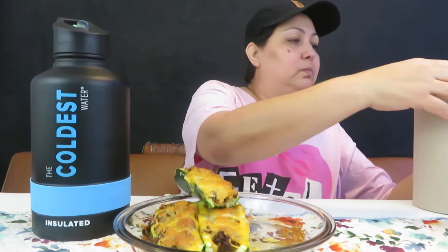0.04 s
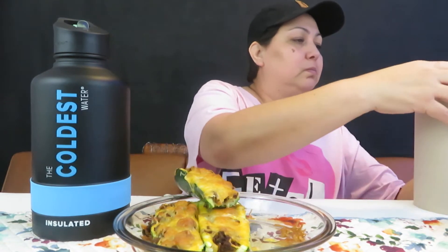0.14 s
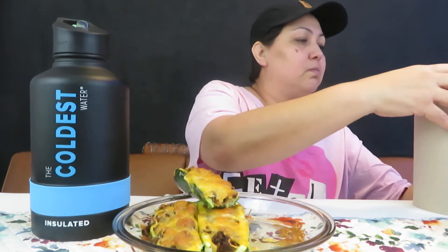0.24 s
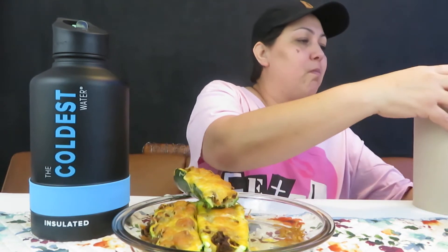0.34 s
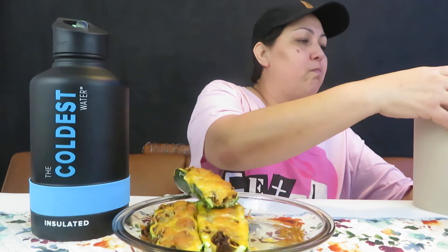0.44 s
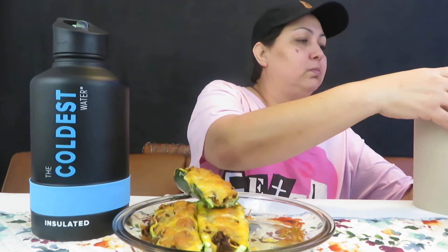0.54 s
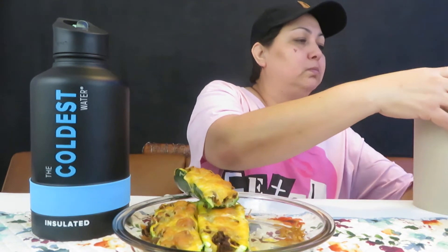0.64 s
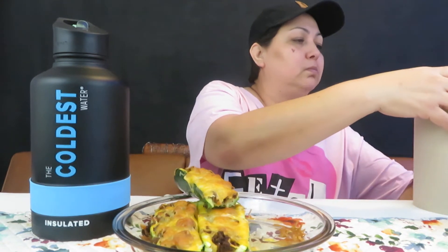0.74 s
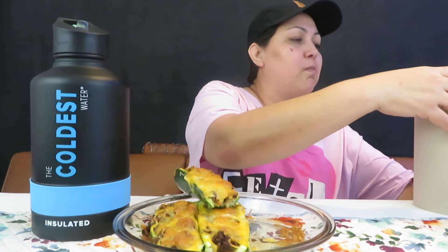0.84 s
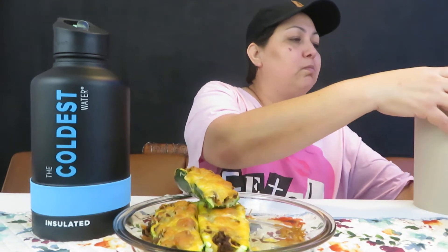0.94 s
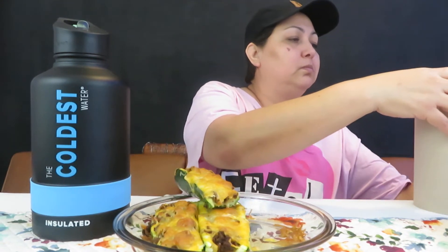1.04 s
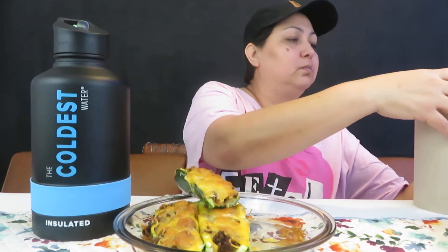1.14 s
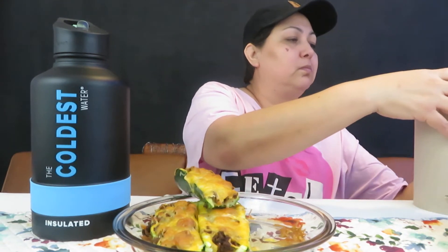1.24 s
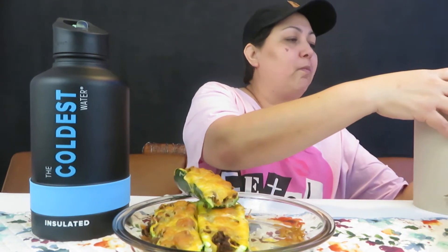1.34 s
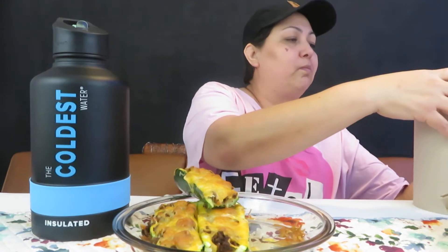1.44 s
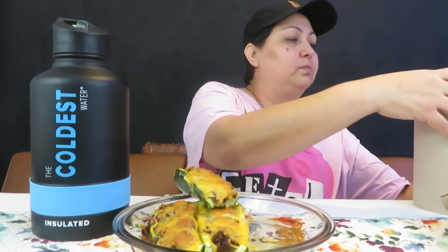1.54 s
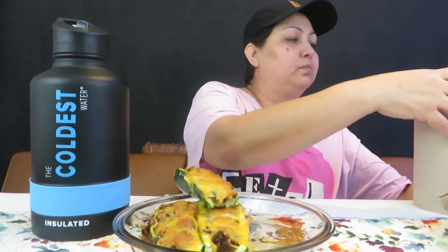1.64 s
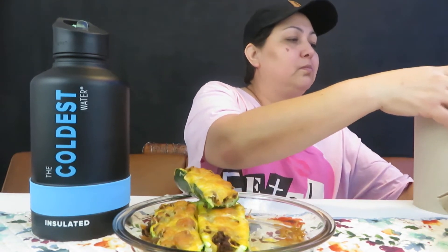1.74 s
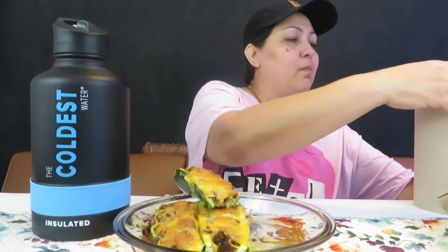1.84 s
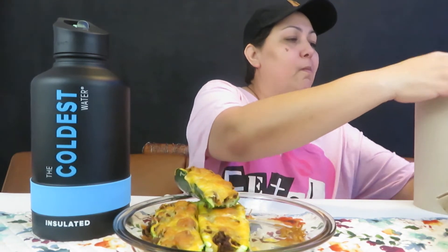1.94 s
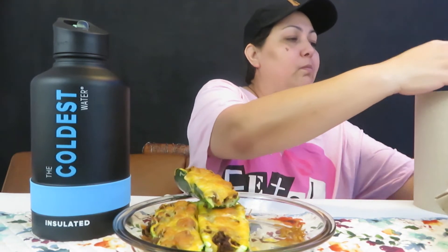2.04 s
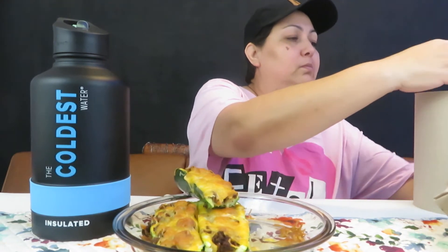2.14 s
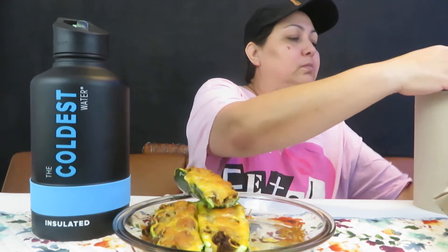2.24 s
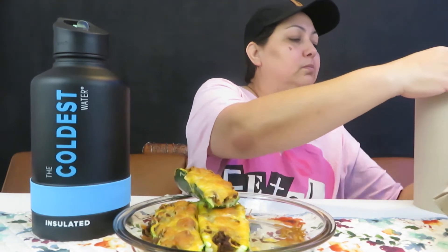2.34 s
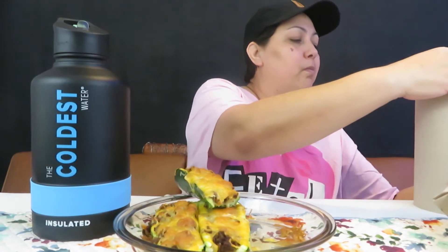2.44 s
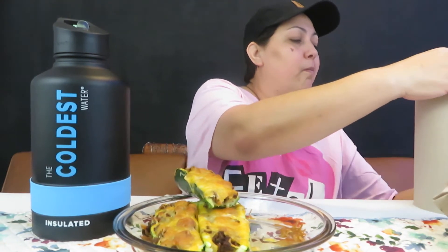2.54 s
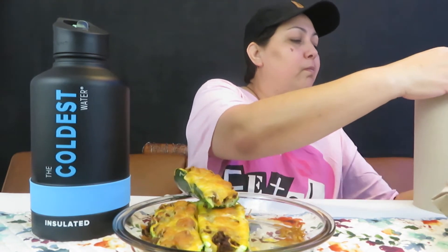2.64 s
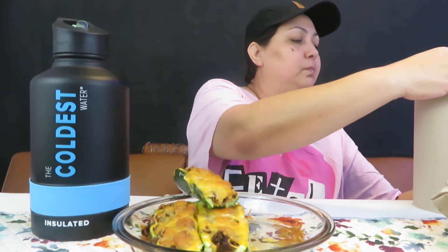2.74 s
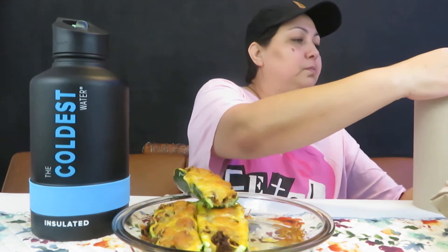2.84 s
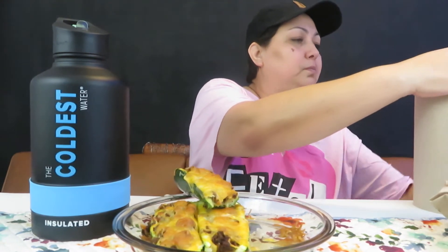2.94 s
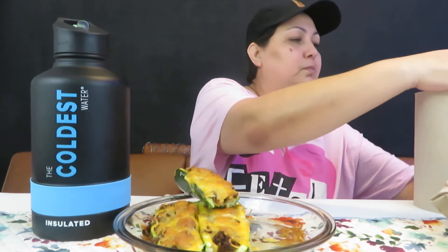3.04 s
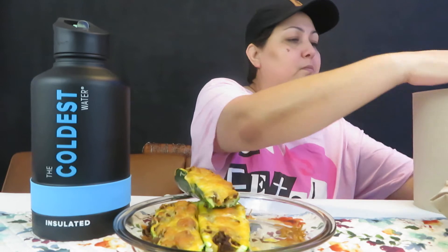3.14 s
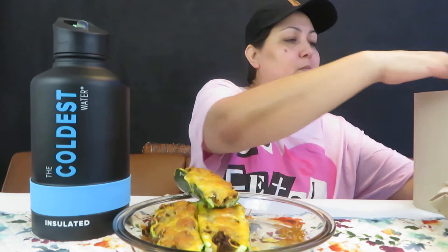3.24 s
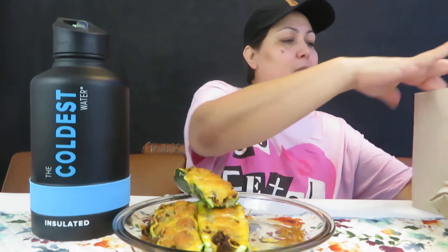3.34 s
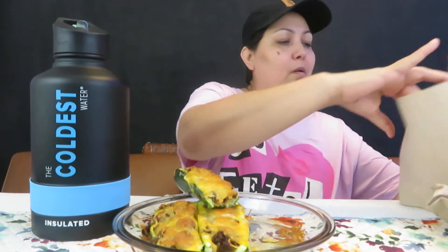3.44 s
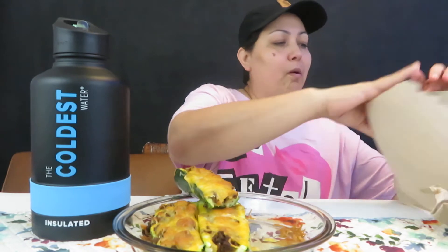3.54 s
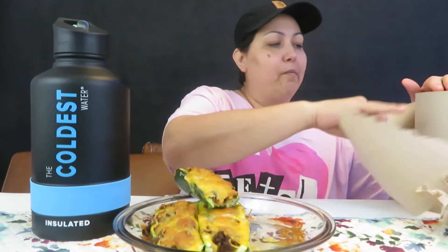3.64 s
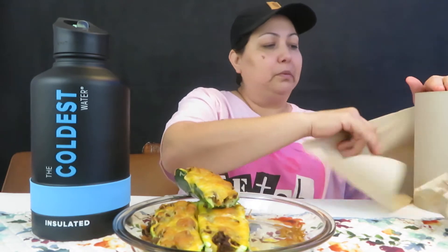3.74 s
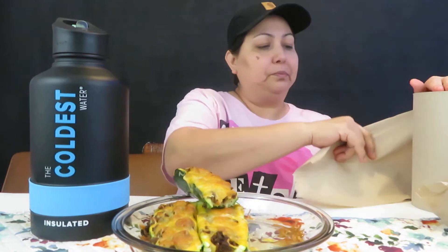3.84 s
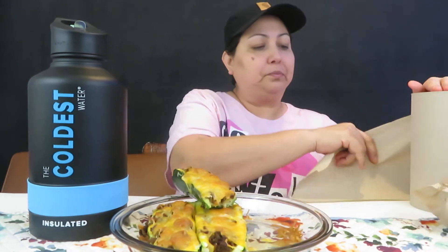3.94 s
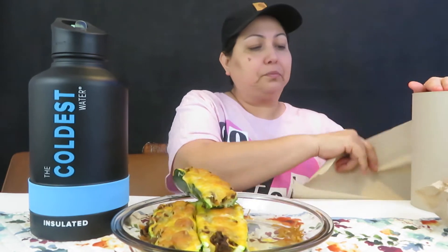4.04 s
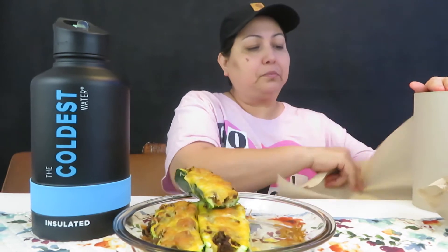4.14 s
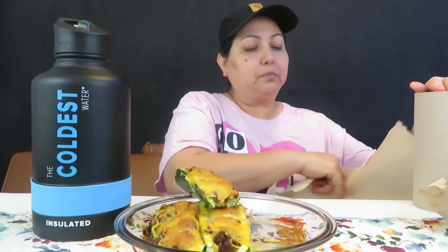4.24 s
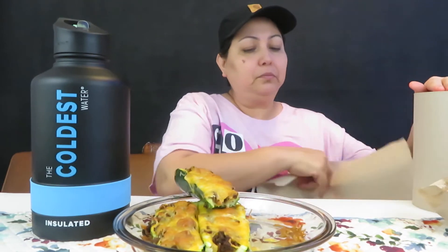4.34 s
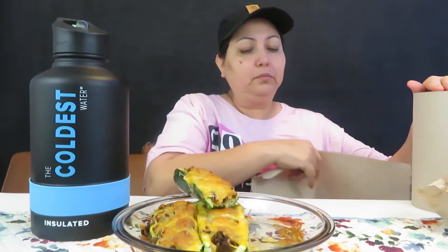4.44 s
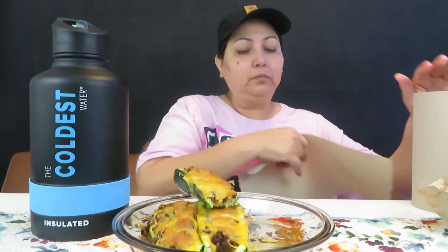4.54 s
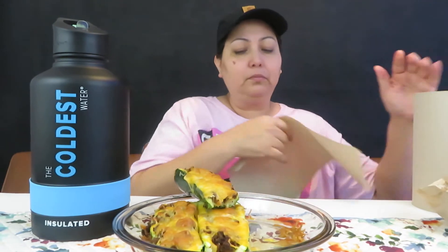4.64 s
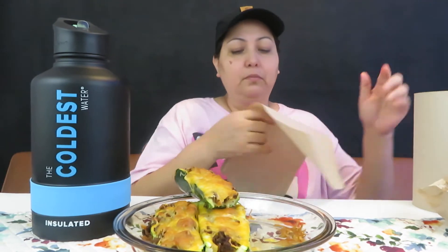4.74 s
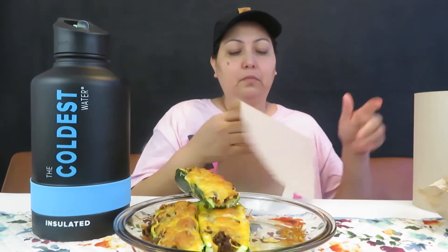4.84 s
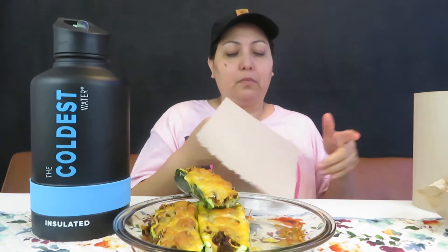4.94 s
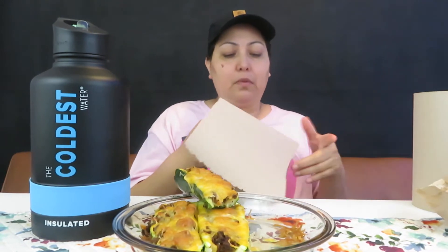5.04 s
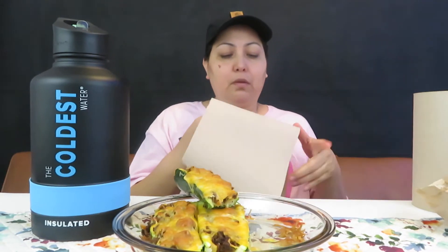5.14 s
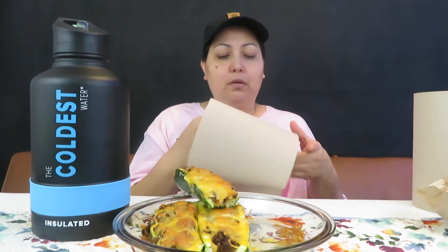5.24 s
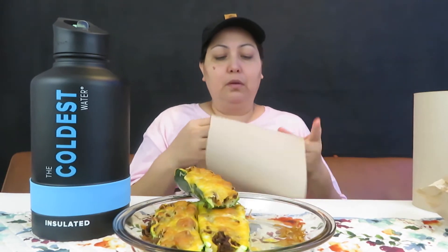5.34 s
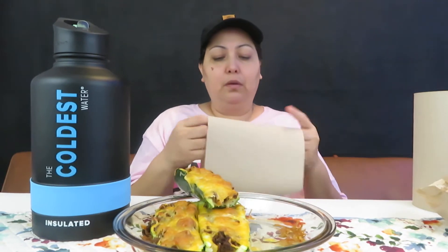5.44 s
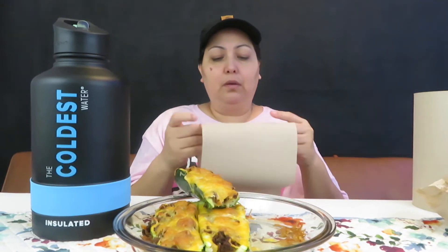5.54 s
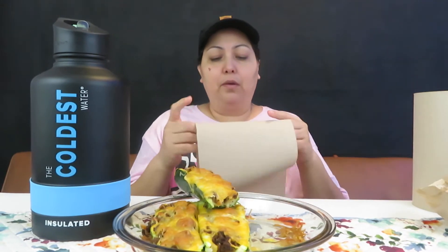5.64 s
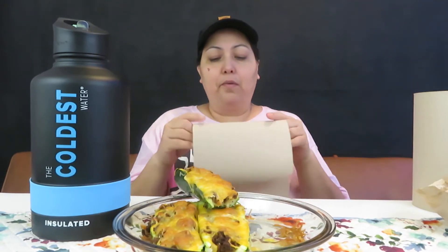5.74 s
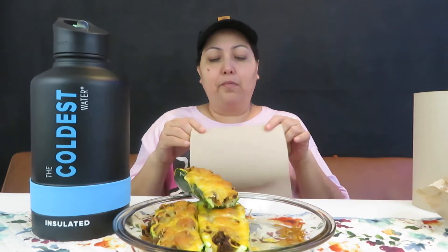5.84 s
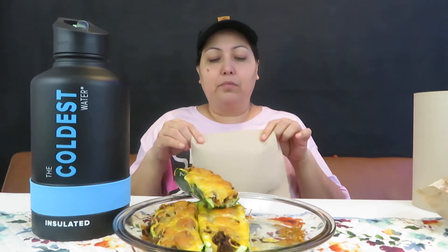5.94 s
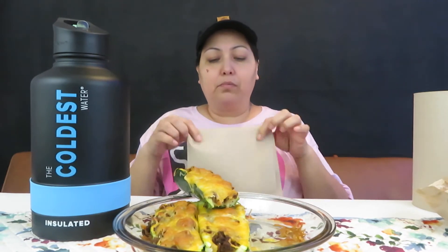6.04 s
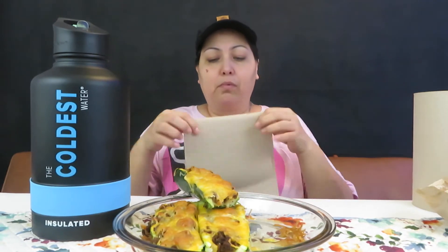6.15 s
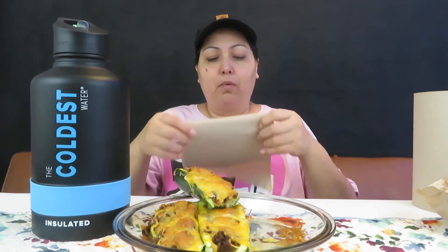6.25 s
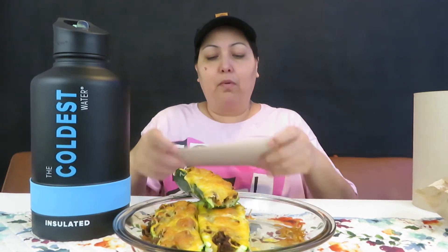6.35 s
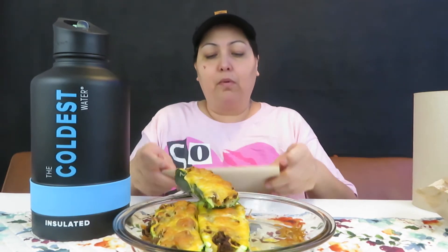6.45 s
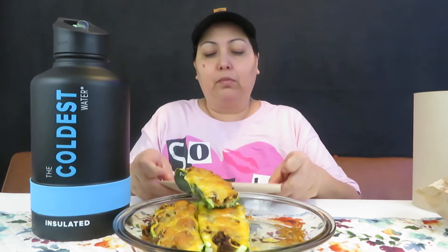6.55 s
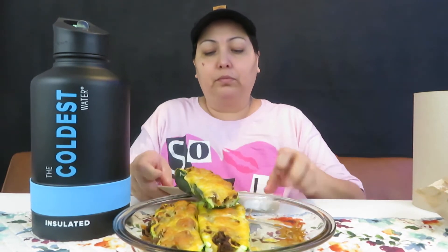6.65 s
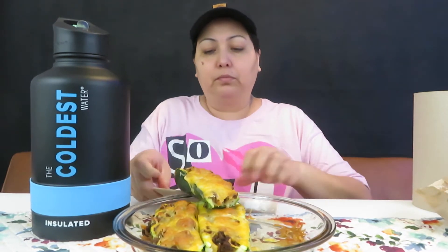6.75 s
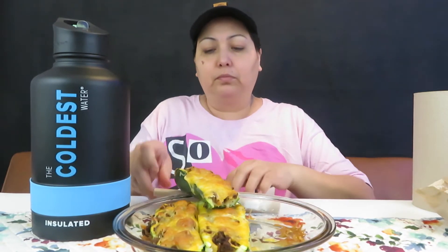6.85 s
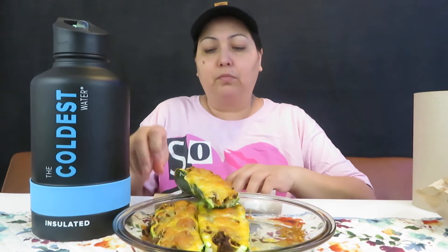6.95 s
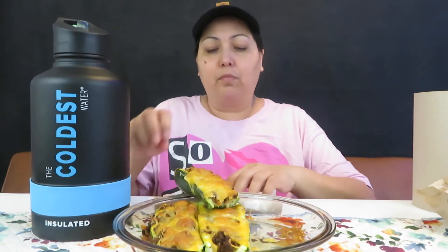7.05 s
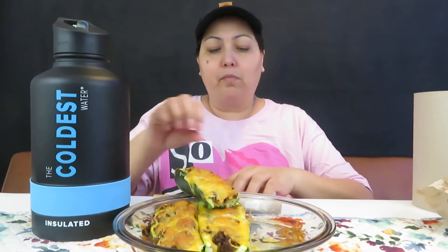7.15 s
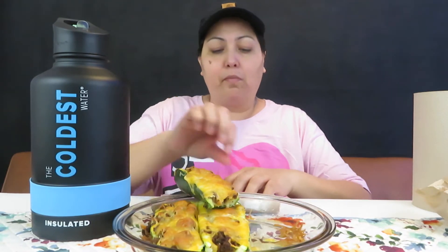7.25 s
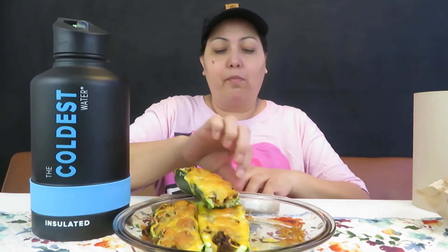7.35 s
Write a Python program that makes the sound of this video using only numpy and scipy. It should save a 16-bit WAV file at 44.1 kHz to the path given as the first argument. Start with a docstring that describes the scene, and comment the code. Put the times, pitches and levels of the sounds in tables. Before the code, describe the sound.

A paper towel roll knocks on a table, rustles quietly, then a sheet rips off with a sharp loud crackle and soft folding rustles follow.

```python
"""A roll of paper towels turns under a hand in a small quiet room: knocks ring the table's modes, creases rustle.
The sheet is pulled: dense tiny clicks ring its patches, fingers hiss as noise, fibres snap as short bursts.
The perforation then gives way with one loud snap and a burst of crackle follows; folding rustles to the end.
Meanwhile the seat creaks in stick and slip. Two close microphone ports hear the paper from the right, then from
the front, over a soft hum of filtered noise."""
import sys
import numpy as np
from scipy import signal
from scipy.fft import rfft, irfft, next_fast_len
from scipy.io import wavfile
from scipy.ndimage import uniform_filter1d, map_coordinates

SR = 44100
rng = np.random.default_rng(int(sys.argv[2]) if len(sys.argv) > 2 else 0)


def waveform_to_disk(signal):
    """Save audio, clipped to [-1, 1], as 16-bit WAV at the path in sys.argv[1]."""
    frames = np.transpose(np.atleast_2d(signal))
    scaled = np.clip(frames, -1, 1) * 32767
    samples = np.round(scaled).astype(np.int16)
    wavfile.write(sys.argv[1], SR, samples)


N = 326340

# Steady room and microphone noise: (frequency [Hz], relative level [dB])
HUM_SPECTRUM = [(15, -40.5), (25, 12), (48, -13), (113, -7), (215, -7), (289, -5.5), (339, -4.5), (468, -6),
                (613, -7.5), (1110, -8), (2480, -8.5), (3610, -13), (11200, -27.5), (13500, -28),
                (15400, -74)]
# How far the hum differs between the ports: (frequency [Hz], side minus mid [dB])
HUM_WIDTH = [(60, -19), (150, 1.5), (380, 3), (950, -1.5), (2380, -5.5), (5970, -1.5), (15000, -2)]
# Room tones: (frequency [Hz], bandwidth [Hz], level [dB])
ROOM_TONES = [(115, 140, -65), (466, 29, -60.5)]
# Near reflections, opposite in the ports: (frequency [Hz], gain [dB])
REFLECTION_SPECTRUM = [(60, -63), (250, -17), (640, -30), (1400, -26), (3000, -13.5), (5000, -2.5),
                       (9000, -9), (15000, 8.5)]
# Where the paper is: (time [s], lag of the left port [us], left minus right [dB], share free of the roll [0-1])
PAPER_PLACE = [(0, 23, -0.5, 0.1), (2.2, 17, 0, 0), (2.7, 22, -0.3, 0.53), (3.4, 9.8, -1.2, 0.2),
               (4.3, 29, 0.6, 0.81), (4.8, 1, -0.7, 0.62), (7.4, 0.77, 0.3, 0.48)]
# Mostly the treble bends round the housing and arrives late: (frequency [Hz], late share [dB])
LATE_SHARE_SPECTRUM = [(2500, -20), (6000, -6), (9000, 0)]
# Arms and roll lean on the table: (time [s], rise [s], hold [s], rumble level [dB])
TABLE_LEANS = [(0.04, 0.023, 0.041, -39), (0.145, 0.01, 0.047, -33.5), (3.12, 0.029, .03, -42.5),
               (3.5, 0.35, .08, -42), (4.11, 0.038, 0.021, -48), (4.6, 0.18, 0.1, -50),
               (6.93, 0.04, .02, -56)]
# Rumble of the leaning: (frequency [Hz], relative level [dB])
RUMBLE_SPECTRUM = [(18, -46), (30, -32), (48, -10), (108, -0.5), (185, -6.5), (268, -6.5), (339, -11),
                   (373, -9.5), (500, -17), (650, -23), (1100, -120)]
# Knocks of roll and hands on the table: (time [s], peak [dB], hardness [dB per octave])
TABLE_KNOCKS = [(0.004, -32, 14), (0.039, -31, 5), (0.087, -31, 13), (0.147, -19.5, -8.5),
                (0.166, -24, -11), (0.207, -22.5, -13), (0.243, -27.5, 3), (0.322, -31, 22),
                (0.345, -30.5, 8), (2.201, -26.5, 16), (2.951, -30, 19), (3.146, -29.5, 7),
                (3.209, -30, 13), (5.794, -53.5, 38), (6.033, -30, 33), (6.695, -30.5, 37),
                (6.958, -34, -4), (7.117, -40, -6)]
# Modes of the table: (frequency [Hz], level [dB], decay by 60 dB [s])
TABLE_MODES = [(108.3, 5, 0.26), (145, 4, 0.15), (228, 0, 0.2), (315, 8, 0.092), (375, 12.5, 0.038),
               (450, -7, 0.24), (550, -8.5, 0.035), (635, -17, 0.021)]
# The seat under shifting weight: (time [s], rate [slips per s], level [dB], unevenness [0-1])
SEAT_CREAK = [(4.64, 84, -70, .25), (4.66, 84, -52, .25), (4.85, 76, -52, .2), (4.88, 74, -47, .03),
              (4.99, 87, -43, .02), (5.08, 76, -45, .03), (5.12, 74, -54, .25), (5.3, 84, -52, .2),
              (5.38, 84, -70, .25)]
# Body of the seat: (frequency [Hz], relative level [dB])
SEAT_SPECTRUM = [(50, -19), (85, 2.5), (170, 4), (250, -5), (340, -1), (420, -0.5), (550, -39), (900, -56)]
# Brief thin squeaks: (time [s], length [s], frequency [Hz], bandwidth [Hz], level [dB])
THIN_SQUEAKS = [(.625, .07, 5030, 60, -61), (5.3, .05, 4150, 500, -54)]
# Strokes of the hands on the paper: (time [s], rise [s], hold [s], crinkle level [dB], crinkle ring [Hz],
# free sheet boom re crinkle [dB], finger friction re crinkle [dB])
HAND_STROKES = [(0.0, 0.018, 0.042, -48, 1610, 4, -13), (0.055, 0.025, 0.1, -42, 2450, -5.5, -10),
                (0.14, 0.015, 0.069, -44, 2380, 0.5, -9), (0.23, 0.015, 0.024, -46, 2400, -2, -15),
                (0.324, 0.008, 0.11, -43, 1730, -9, -11), (0.417, 0.06, 0.079, -40, 1700, -10.5, -15.5),
                (0.589, 0.028, 0.029, -42, 1810, -6, -6), (0.754, 0.01, 0.13, -53, 2080, -8, 1.5),
                (1.313, 0.022, 0.037, -37, 2800, -15, -13.5), (1.446, 0.024, 0.13, -47.5, 1780, -6, -2.5),
                (1.559, 0.023, 0.013, -44.5, 1870, -6, -3.5), (1.694, 0.019, 0.059, -42.5, 1700, -26, -8.5),
                (1.83, 0.016, 0.017, -48, 2980, -9, -15), (2.197, 0.0051, 0.045, -41.5, 1400, -4, -20),
                (2.625, 0.02, .025, -43, 2200, -23, -9), (2.753, 0.072, 0.14, -49, 2090, -3, -3),
                (2.909, 0.049, 0.064, -37, 1900, -15, -4.5), (3.042, 0.037, 0.018, -35, 1890, -32, -14.5),
                (3.124, 0.0086, 0.12, -44.5, 1800, -2, -13.5), (3.273, 0.026, 0.18, -43, 1820, -10, -9),
                (3.428, 0.0099, 0.016, -34, 1510, -7.5, -17), (3.46, 0.017, 0.018, -33.5, 1910, -8.5, -8),
                (3.525, 0.016, 0.034, -37.5, 1570, -26, -5.5), (3.564, 0.039, 0.02, -33.5, 1700, -8, -23),
                (3.606, 0.035, 0.12, -29.5, 1910, -5.5, -9.5), (3.739, 0.035, 0.055, -29, 1710, -1.5, -8),
                (3.826, 0.024, 0.12, -28.5, 1930, 0.5, -17), (3.943, 0.019, 0.056, -35.5, 1550, 1, -7.5),
                (4.002, 0.022, 0.098, -34.5, 1780, 1, -2.5), (4.093, 0.0058, 0.028, -24.5, 1740, 1, -18.5),
                (4.132, 0.014, 0.032, -24.5, 2070, 3.5, -10.5), (4.201, 0.016, 0.051, -22, 1870, -11, -14),
                (4.28, 0.013, 0.018, -24.5, 1980, -11, -25), (4.476, 0.0039, 0.022, -36, 1620, -10, -10),
                (4.563, 0.016, 0.067, -46.5, 1780, -13, -10), (4.633, 0.016, 0.022, -57, 1710, 6.5, -8),
                (4.668, 0.032, 0.074, -42.5, 1850, -6.5, -6.5), (4.807, 0.016, 0.077, -47.5, 1780, -3, -28),
                (4.948, 0.043, 0.084, -45.5, 1540, -5.5, -16), (5.075, 0.03, 0.035, -38.5, 2000, -20, -8),
                (5.213, .02, 0.072, -54, 1640, -3, -7.5), (5.363, 0.012, 0.034, -38.5, 1400, -8, -10),
                (5.388, 0.018, 0.084, -39, 1730, -3, -8), (5.5, 0.014, 0.33, -41.5, 1570, -9.5, -6.5),
                (5.746, 0.056, 0.14, -35.5, 1470, -11, -11.5), (5.876, 0.056, 0.057, -35.5, 1780, -7, -8),
                (6.002, 0.025, 0.054, -35, 1890, -9.5, -6.5), (6.155, 0.0041, 0.021, -40, 1950, -5.5, -3.5),
                (6.2, 0.016, 0.039, -41.5, 1980, -15, -23), (6.262, 0.028, 0.03, -31.5, 1950, -24, -9),
                (6.374, 0.014, 0.089, -47.5, 2040, -25, -2), (6.537, 0.014, 0.088, -42.5, 1680, -9, -8),
                (6.646, 0.011, 0.12, -45.5, 2340, -7.5, -9.5), (6.81, 0.018, 0.047, -45, 1880, -26, -7.5),
                (6.919, 0.033, 0.062, -38, 1650, -13.5, -14), (7.094, 0.012, 0.088, -51, 2070, -22, -5),
                (7.158, 0.1, 0.076, -44.5, 1980, -11, -12)]
# Hiss of fingers on paper: (frequency [Hz], relative level [dB])
FRICTION_SPECTRUM = [(1880, -16), (3200, -4), (6820, -15.5), (11100, -18), (12700, -23.5), (15100, -34),
                     (15400, -43)]
# The boom moves as the sheet bends and tightens: (time [s], frequency [Hz])
SHEET_BOOM_PITCH = [(0, 480), (3.4, 630), (3.63, 1250), (3.74, 1150), (3.78, 507), (3.82, 800), (3.86, 720),
                    (3.91, 960), (3.96, 740), (4.09, 760), (4.15, 830), (4.22, 890), (4.3, 1120),
                    (4.45, 700), (5.4, 890), (5.8, 550), (7.4, 550)]
# Boom of the sheet: (frequency [Hz], relative level [dB])
BOOM_SPECTRUM = [(120, -4), (200, -9), (330, -1), (503, -0.5), (743, -1.5), (1020, -0.5), (1300, 3),
                 (1560, -2), (2640, -120)]
# Crinkle of the free sheet: (frequency [Hz], relative level [dB])
FREE_CRINKLE_SPECTRUM = [(410, -4.5), (700, -7.5), (934, -9), (1700, -5), (2110, -6), (2630, -8),
                         (2830, -9), (5000, -21.5), (6500, -2), (11000, -120)]
# Crinkle of paper still wound on the roll: (frequency [Hz], relative level [dB])
ROLL_CRINKLE_SPECTRUM = [(410, -44), (700, -45), (754, -14.5), (1080, 0.5), (1200, -3), (1720, -2.5),
                         (2270, -2.5), (2480, 1.5), (5000, -27), (6500, -47), (11000, -120)]
# Snaps of creases and fibres: (time [s], peak [dB], ring [Hz])
PAPER_SNAPS = [(0.323, -32, 1220), (1.334, -33, 2800), (2.202, -32, 1310), (3.431, -21.5, 1550),
               (3.456, -39, 2400), (3.486, -16, 3120), (3.593, -21, 2650), (3.63, -29, 1250),
               (3.658, -16, 1260), (3.665, -14, 1780), (3.703, -16.5, 1190), (3.777, -23, 1660),
               (3.8101, -15, 850), (3.849, -18.5, 700), (3.882, -26, 816), (3.899, -25, 970),
               (3.923, -21, 1143), (3.9605, -23, 900), (3.976, -19, 745), (4.0, -16.5, 760),
               (4.024, -22, 750), (4.035, -22, 2000), (4.1022, -3.5, 1400), (4.1068, -18, 1390),
               (4.1095, -21, 1600), (4.1187, -9, 900), (4.148, -7.5, 810), (4.1552, -18, 920),
               (4.169, -6, 1010), (4.196, -12, 2100), (4.21, -10, 960), (4.233, -10.5, 1950),
               (4.241, -10, 1800), (4.258, -7, 1510), (4.276, -11, 2000), (4.3, -11, 1200),
               (4.315, -16, 1900), (4.478, -23, 1310), (4.499, -24, 1750), (4.565, -28, 2510),
               (4.791, -24.5, 1800), (5.123, -29, 1460), (5.374, -36, 990), (5.417, -22, 1530),
               (5.455, -18.5, 1730), (5.801, -24.5, 650), (5.856, -27, 1560), (5.904, -22, 1530),
               (5.935, -24, 1700), (5.957, -19, 2700), (5.976, -36, 1600), (6.047, -29, 1690),
               (6.06, -30, 1890), (6.1694, -19.5, 1950), (6.283, -34, 1980), (6.296, -35, 2020),
               (6.312, -38, 3600), (6.319, -39, 1900), (6.564, -28, 1480), (6.951, -32, 1790)]
# The perforation gives way: (time [s], peak [dB], ring [Hz], decay by 60 dB [s])
PERFORATION_TEAR = (4.1002, 5, 1450, .022)

HUM_DB = -53.5                                         # rms of what the ports share, without the room tones
ROOM_T60_S, NEAR_T60_S, ROOM_DB = 0.38, 0.057, -7      # ROOM_DB sets the common tail
ROOM_LOW_HZ = 300                                      # the tail holds no bass
LEAN_FADE_DB_PER_S, RUMBLE_FLOOR_DB = 103, -52.5
SETTLE_DB_PER_S, SLIDE_DB_PER_S = 140, 120             # paper settles; fingers slide on a little longer
SLIDE_BLUR_MS = 25                                     # fingers start to slide gradually
HANDS_APART_DB = -13                                   # hiss that differs between the ports, re the shared hiss
REST_DB, REST_HZ, REST_BOOM_DB, REST_FRICTION_DB = -78, 1850, -69.5, -85   # paper left alone
CREASES_PER_S, FLEXES_PER_S, RUBS_PER_S = 8000, 8000, 12000   # clicks behind crinkle, boom and hiss
CLICK_SPREAD_DB = 2.3                                  # unevenness of creases and flexes
CLUMP_DB, BOOM_CLUMP_DB, HISS_CLUMP_DB = 0.8, 1.3, 2.2   # how much the clicks bunch up
PATCH_DB, BOOM_PATCH_DB = 1.4, 2.0                     # how much each patch of paper wavers
PATCH_WIDTH_OCTAVES = 0.24                             # how far around the sheet's ring the patches are lifted
SNAP_T60_S, SNAP_TOP_HZ = 0.012, 3800
CEILING, CUTOFF_HZ = 0.97, 15600                       # converter limit and top of the band


def from_db(db):
    """Decibels to gain."""
    return 10 ** (np.asarray(db) / 20)


def rms_one(x):
    """Scale to rms 1."""
    return x / np.sqrt(np.mean(x ** 2) + 1e-20)


def filtered(x, order, hz, kind):
    """Butterworth filter."""
    return signal.sosfilt(signal.butter(order, hz, kind, fs=SR, output="sos"), x)


def in_time(rows):
    """Columns of a curve table, one value per sample."""
    s, *columns = np.transpose(rows)
    return [np.interp(np.arange(N) / SR, s, c) for c in columns]


def per_sample(x):
    """From one value a millisecond to one a sample."""
    return np.interp(np.arange(N) / SR * 1000, np.arange(len(x)), x)


def colour(x, spectrum):
    """Filter by a (frequency, dB) table, read on a log frequency axis."""
    size = next_fast_len(x.shape[-1])
    hz, db = np.transpose(spectrum)
    bins_hz = np.fft.rfftfreq(size, 1 / SR)
    gain = from_db(np.interp(np.log(bins_hz + 1), np.log(hz), db))
    return irfft(rfft(x, size) * gain, size)[..., :x.shape[-1]]


def drift(rate_hz):
    """Slow random wander of rms 1: noise through two equal poles, run at every 40th sample."""
    r = np.exp(-80 * np.pi * rate_hz / SR)
    noise = rng.standard_normal(N // 40 + 2002)
    slow = signal.lfilter([1], [1, -2 * r, r * r], noise)[2000:]   # drop the run-in
    return np.interp(np.arange(N) / 40, np.arange(len(slow)), rms_one(slow))


def narrow(hz, width_hz):
    """Noise in a narrow band, rms 1."""
    return rms_one(filtered(rng.standard_normal(N), 2, [hz - width_hz / 2, hz + width_hz / 2], "band"))


def ring(clicks, hz, t60):
    """A unit click sets a decaying sine of starting height 1 ringing."""
    r, w = from_db(-60 / (t60 * SR)), 2 * np.pi * hz / SR
    return signal.lfilter([0, np.sin(w)], [1, -2 * r * np.cos(w), r * r], clicks + 1e-18)


def grains(per_s, spread_db, clump_db):
    """Random clicks of uneven size and either sign, coming in clumps."""
    sizes = from_db(spread_db * np.minimum(rng.exponential(1, N), 5))
    signs = rng.choice([-1, 1], N)
    struck = rng.random(N) < per_s / SR
    return rms_one(sizes * signs * struck) * from_db(clump_db * drift(10.3))


def swells(rows, fade_db_per_s):
    """Power of each (time, rise, hold, dB) row, once a millisecond: a ramp, a plateau, a steady fade."""
    s, rise, hold, level_db = np.array(rows)[:, :4, None].transpose(1, 0, 2)
    since = np.arange(0, N / SR + 1 / 500, 1 / 1000) - s
    ramp = np.clip(since / rise, 0, 1) ** 2
    fade_db = fade_db_per_s * np.maximum(since - rise - hold, 0)
    return (ramp * from_db(level_db - fade_db)) ** 2


def hum():
    """Steady room and microphone noise, narrow in the deep bass, with two wavering room tones."""
    mid, side = colour(rng.standard_normal((2, N)), HUM_SPECTRUM)
    side = colour(side, HUM_WIDTH)
    tones = sum(from_db(db) * narrow(hz, width_hz) for hz, width_hz, db in ROOM_TONES)
    return from_db(HUM_DB) / np.std(mid) * (mid + side * [[1], [-1]]) + tones


def room(x):
    """Echoes as dying noise: a tail common to both ports, and short near reflections opposite in them."""
    t = np.arange(SR // 2) / SR
    t60 = np.array([[ROOM_T60_S], [NEAR_T60_S]])
    tails = rng.standard_normal((2, len(t))) * from_db(-60 * t / t60) * (t > .002)
    tails = tails / np.sqrt(np.sum(tails ** 2, axis=1, keepdims=True))
    common, opposite = signal.fftconvolve(x[None], tails, axes=1)[:, :N]
    common = filtered(common, 2, ROOM_LOW_HZ, "high")
    return from_db(ROOM_DB) * common, colour(opposite, REFLECTION_SPECTRUM)


def rumble():
    """Leaning arms and roll swell a low noise in the table above a constant floor."""
    power = swells(TABLE_LEANS, LEAN_FADE_DB_PER_S).sum(axis=0) + from_db(2 * RUMBLE_FLOOR_DB)
    return per_sample(np.sqrt(power)) * rms_one(colour(rng.standard_normal(N), RUMBLE_SPECTRUM))


def knocks():
    """A click and a 45 ms fading scrape strike the table modes; a hard contact favours the upper modes."""
    out, size = np.zeros(N), 12000
    t = np.arange(size) / SR
    for s, peak_db, hardness_db in TABLE_KNOCKS:
        contact = rng.standard_normal(size) * from_db(-60 * t / 0.045) + 6.0 * (t == 0)
        knock = np.zeros(size)
        for hz, db, t60 in TABLE_MODES:
            tilt_db = hardness_db * np.log2(hz / 220)
            knock += from_db(db + tilt_db) * ring(contact, hz, t60)
        at = round(s * SR)
        out[at:at + size] += (from_db(peak_db) * knock / np.abs(knock).max())[:N - at]
    return filtered(out, 2, 60, "high")


def creak():
    """Stick and slip: a pulse per slip, uneven in time and size, coloured by the seat."""
    per_s, level_db, uneven = in_time(SEAT_CREAK)
    turns = np.cumsum(per_s / SR) + uneven * drift(28.6)
    slip_count = np.floor(np.maximum.accumulate(turns))
    slips = np.diff(slip_count, prepend=0) * from_db(10.0 * uneven * drift(44.0))
    audible = level_db > -69
    return -from_db(level_db) * audible * rms_one(colour(slips, SEAT_SPECTRUM))


def squeaks():
    """Narrow noise that starts at once, holds, then fades."""
    t, out = np.arange(N) / SR, 0
    for s, length, hz, width_hz, level_db in THIN_SQUEAKS:
        envelope = (t > s) * np.exp(-np.clip((t - s) / length, 0, 3) ** 4)
        out = out + from_db(level_db) * narrow(hz, width_hz) * envelope
    return out


def finger_hiss(spread_db):
    """Fingers rub over the fibres: dense clumped clicks blend into a hiss, rms 1."""
    return rms_one(colour(grains(RUBS_PER_S, spread_db, HISS_CLUMP_DB), FRICTION_SPECTRUM))


def patches(clicks, low_hz, high_hz, ring_hz, cycles, lift_db, patch_db, count):
    """Each click rings one small patch of paper for some cycles; patches near the sheet's ring are louder."""
    dealt, out = rng.integers(0, count, N), 0
    for k, hz in enumerate(np.geomspace(low_hz, high_hz, count)):
        near = np.exp(-(np.log2(hz / ring_hz) / PATCH_WIDTH_OCTAVES) ** 2)
        patch = ring(clicks * (dealt == k), hz, cycles / hz) * hz      # even level per Hz across patches
        out = out + patch * from_db(lift_db * near + patch_db * drift(6.0))
    return out


def sheet_boom():
    """Flexing rings the low patches of the sheet around its moving pitch, rms 1."""
    boom_hz, = in_time(SHEET_BOOM_PITCH)
    flexes = grains(FLEXES_PER_S, CLICK_SPREAD_DB, BOOM_CLUMP_DB)
    ringing = patches(flexes, 201, 1390, boom_hz, 12.3, 8.6, BOOM_PATCH_DB, count=14)
    return rms_one(colour(ringing, BOOM_SPECTRUM))


def crinkle(free, ring_hz):
    """Buckling creases ring small patches; paper free of the roll rings more sharply and in its own colour."""
    creases = grains(CREASES_PER_S, CLICK_SPREAD_DB, CLUMP_DB)
    ringing = patches(creases, 733, 4785, ring_hz, 23.5, 3.64 + 6.3 * free, PATCH_DB, count=18)
    loose = rms_one(colour(ringing, FREE_CRINKLE_SPECTRUM))
    wound = from_db(-2.0) * rms_one(colour(ringing, ROLL_CRINKLE_SPECTRUM))
    return free * loose + (1 - free) * wound


def snaps():
    """One hard click and its fading cluster ring the sheet at its pitch and over a wide band."""
    out, size = np.zeros(N), 2000
    t = np.arange(size) / SR
    for s, peak_db, hz, t60 in [PERFORATION_TEAR] + [(*snap, SNAP_T60_S) for snap in PAPER_SNAPS]:
        crack = rng.standard_normal(size) * from_db(-60 * t / t60) + 5.0 * (t == 0)
        tone = ring(crack, hz, 9.0 / hz)   # dies in nine cycles
        wide = filtered(crack, 4, [350, 3800], "band")
        snap = tone / np.abs(tone).max() + .4 * wide / np.abs(wide).max()
        snap = filtered(snap, 2, SNAP_TOP_HZ, "low")
        at = round(s * SR)
        out[at:at + size] += from_db(peak_db) * snap / np.abs(snap).max()
    return out


def thin(x):
    """Light paper cannot radiate bass."""
    return filtered(x, 3, 130, "high")


def paper(free):
    """Crinkle, boom and hiss share the strokes; the louder a stroke, the more it sets the crinkle's ring."""
    power, rest = swells(HAND_STROKES, SETTLE_DB_PER_S), from_db(2 * REST_DB)
    stroke_hz, boom_db, friction_db = np.array(HAND_STROKES)[:, 4:].T
    crinkling = power.sum(axis=0) + rest
    ring_hz = per_sample((stroke_hz @ power + REST_HZ * rest) / crinkling)
    booming = from_db(2 * boom_db) @ power + from_db(2 * REST_BOOM_DB)
    sliding = from_db(2 * friction_db) @ swells(HAND_STROKES, SLIDE_DB_PER_S) + from_db(2 * REST_FRICTION_DB)
    sliding = uniform_filter1d(sliding, size=SLIDE_BLUR_MS)
    slide_gain = per_sample(np.sqrt(sliding))

    sheet = per_sample(np.sqrt(crinkling)) * crinkle(free, ring_hz)
    sheet += per_sample(np.sqrt(booming)) * sheet_boom()
    sheet += slide_gain * finger_hiss(spread_db=1.0)
    apart = from_db(HANDS_APART_DB) * slide_gain * finger_hiss(spread_db=2.0)
    return thin(sheet + snaps()), apart


def scene():
    """Paper, table and seat, placed between the ports, with room and hum."""
    lag_us, pan_db, free = in_time(PAPER_PLACE)
    sheet, apart = paper(np.clip(free, 0, 1))
    near = sheet + squeaks() + knocks() + rumble() + creak()
    common, opposite = room(near)
    right = near + common
    late = map_coordinates(right, [np.arange(N) - lag_us * SR / 10 ** 6], order=3, mode="nearest")
    left = right + colour(late - right, LATE_SHARE_SPECTRUM)
    placed = np.array([left * from_db(pan_db / 2), right * from_db(-pan_db / 2)])
    return placed + (opposite + apart) * [[1], [-1]] + hum()


def record(dry):
    """The microphone loses the deepest bass, the converter clips at its ceiling, the top is cut."""
    dry = filtered(dry, 1, 28, "high")
    clipped = np.clip(dry, -CEILING, CEILING)
    return signal.sosfilt(signal.cheby2(16, 60, CUTOFF_HZ, fs=SR, output="sos"), clipped)


dry = scene()
out = record(dry)
waveform_to_disk(out)
```